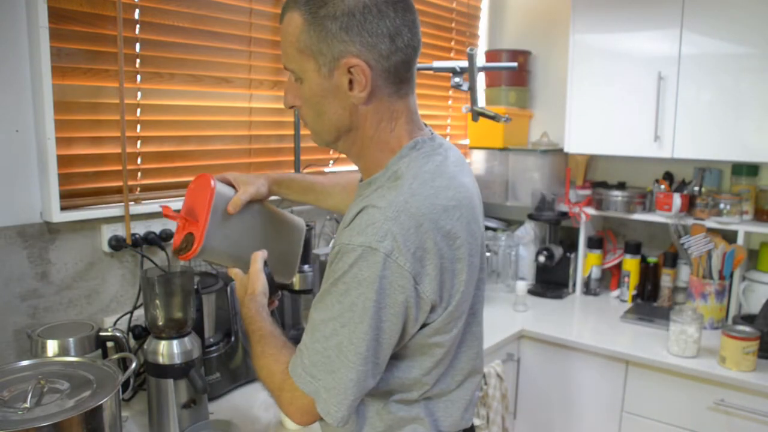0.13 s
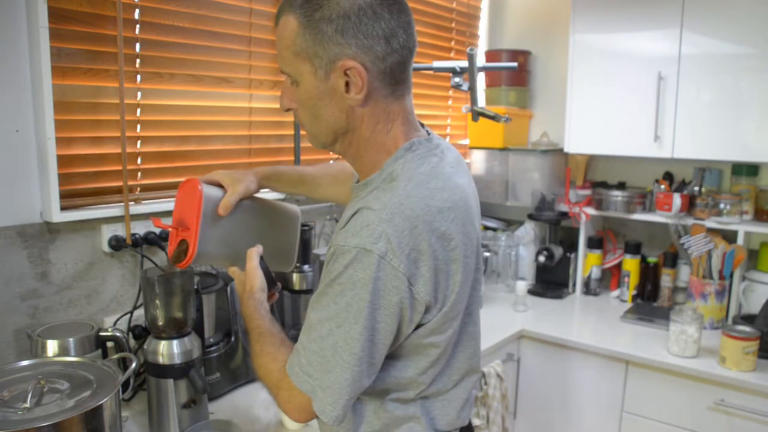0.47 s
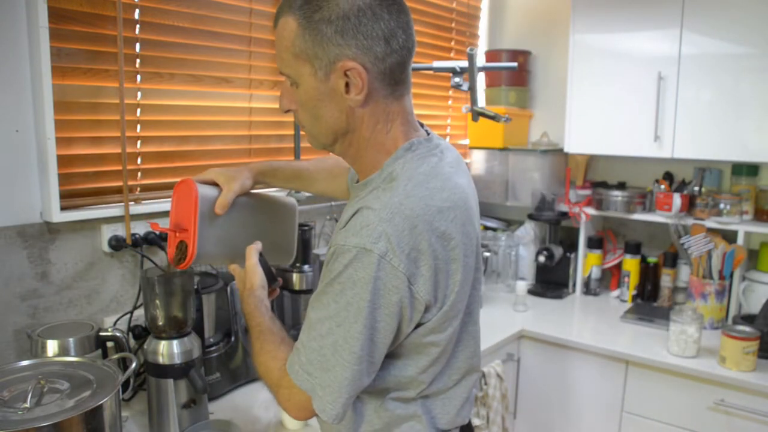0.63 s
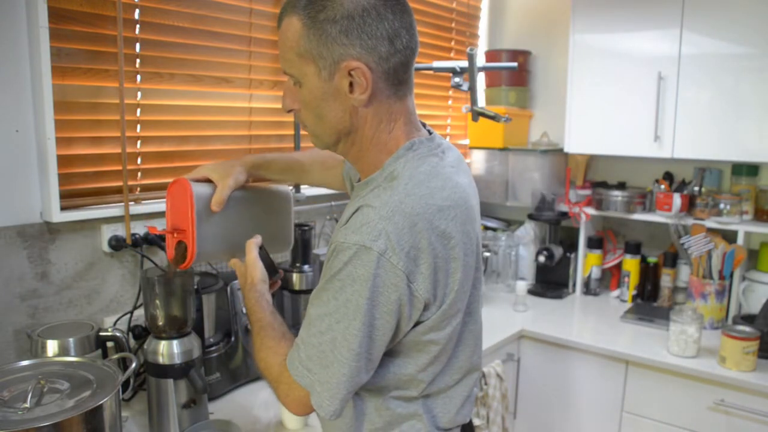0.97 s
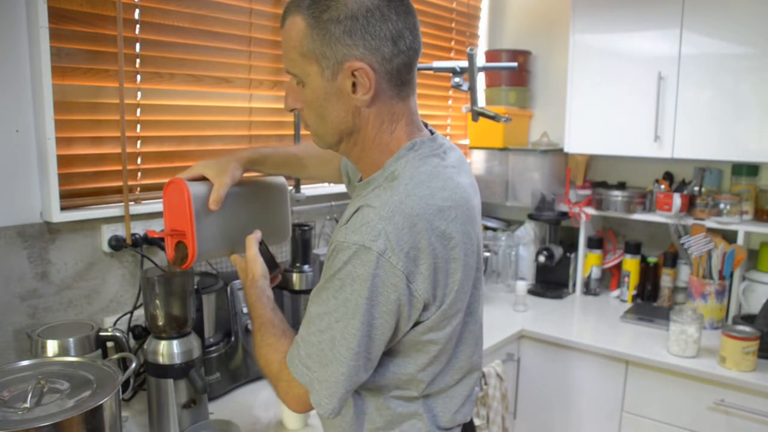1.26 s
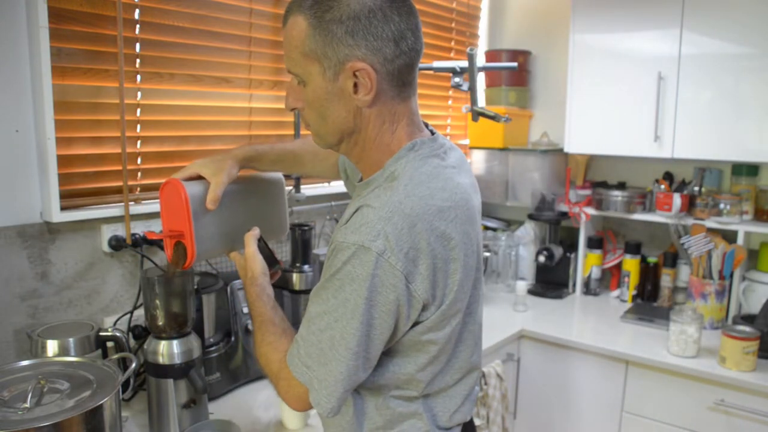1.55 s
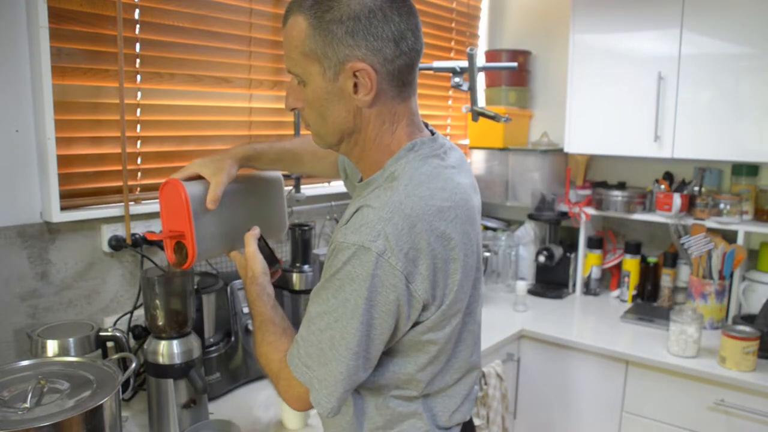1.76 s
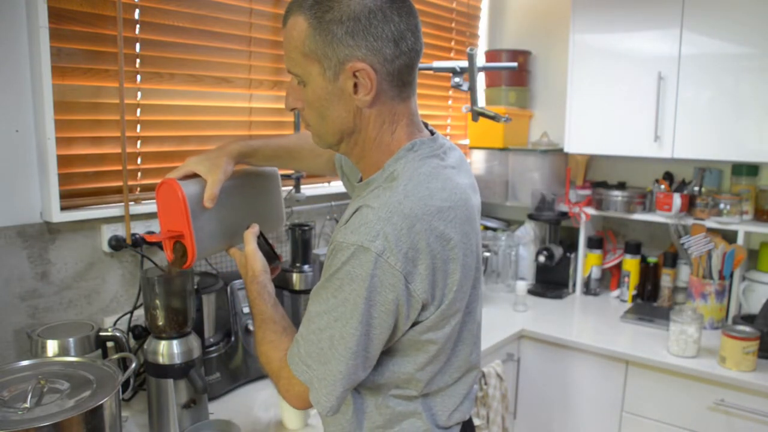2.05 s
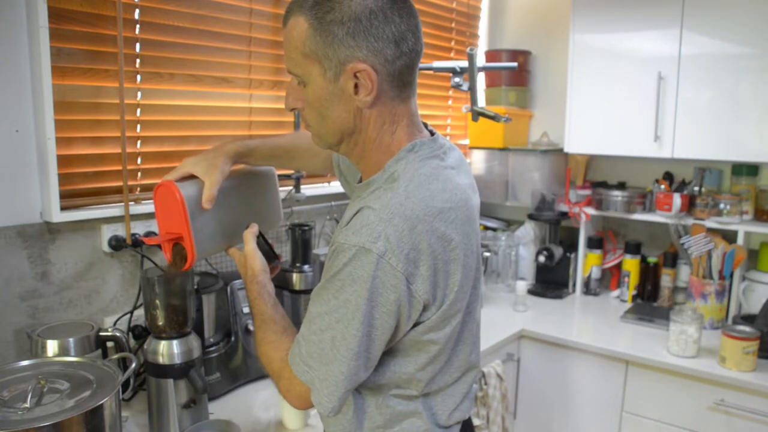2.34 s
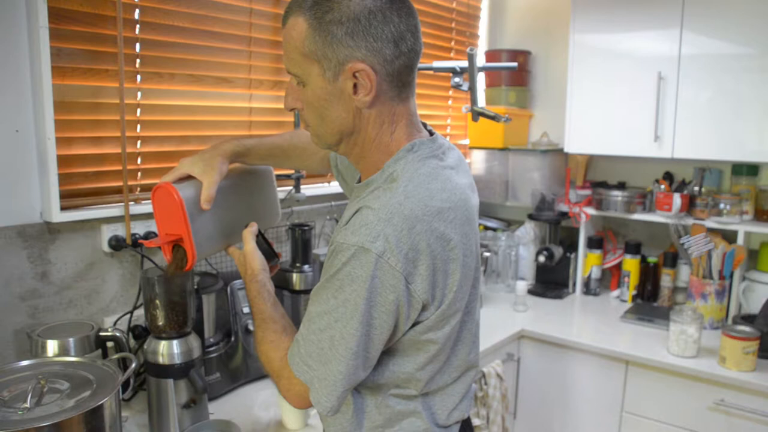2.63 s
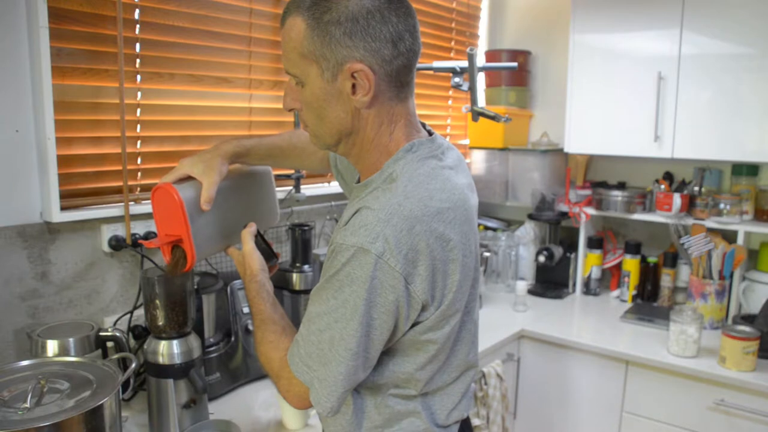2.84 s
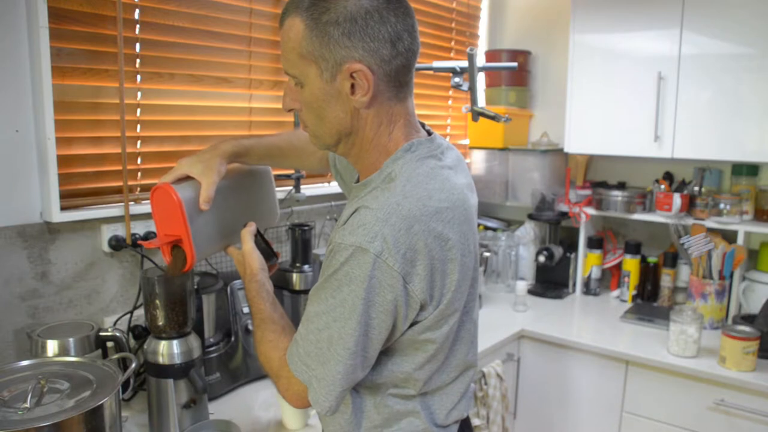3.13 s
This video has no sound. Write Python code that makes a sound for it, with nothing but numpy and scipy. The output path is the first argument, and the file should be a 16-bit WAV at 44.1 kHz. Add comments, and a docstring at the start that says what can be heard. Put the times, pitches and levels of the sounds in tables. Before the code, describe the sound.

Roasted coffee beans pour from a plastic tub into a grinder hopper with a dense rattle

```python
"""Roasted coffee beans slide in a tipped plastic tub over a faint appliance hum in a small kitchen,
then pour into the hopper of a grinder. Random contacts excite short resonances: the first beans ring
on the bare hopper, and as it fills they land on other beans with a drier rattle.
The air in the hopper hums under the steady pour; reflections in the hopper and room spread each click."""
import sys
import numpy as np
from scipy import signal
from scipy.fft import rfft, irfft
from scipy.io import wavfile

SR = 44100
rng = np.random.default_rng(int(sys.argv[2]) if len(sys.argv) > 2 else 0)


def dump(signal):
    """Clip the signal to [-1, 1] and save it as 16-bit WAV at the path in sys.argv[1]."""
    limited = np.clip(np.atleast_2d(signal).T, -1, 1)
    pcm = np.round(limited * 32767).astype(np.int16)
    wavfile.write(sys.argv[1], SR, pcm)


N = 145530

# The steady pour: (time [s], drive of beans on beans [dB], drive of beans on the bare hopper [dB],
# tilt of the bean clicks [dB per octave], low ring of the hopper against its high ring [dB])
POUR_COURSE = [(0.2, -26.5, -29.5, -3.5, 3), (0.25, -32, -35, -7, 2), (0.26, -21, -46, 2.5, 2.5),
               (0.28, -25.5, -42, 0.5, -0.5), (0.39, -26, -26, -1, -0.5), (0.44, -24.5, -24, 0.5, 1),
               (0.6, -34.5, -26.5, -1.5, 0), (0.8, -29.5, -27.5, 0.5, -1.5), (0.93, -33.5, -29, 0.5, -0.5),
               (1.22, -28, -39, 1.5, -2), (1.26, -33, -34.5, 0.5, -1), (1.67, -27.5, -37, -0.5, -7),
               (1.86, -32.5, -43, 1, 0.5), (1.87, -29, -47, -1.5, -8), (2.09, -39.5, -44.5, 5, -1),
               (2.13, -34.5, -50, 4.5, 1.5), (2.71, -32, -42, 2, -3), (3.3, -39.5, -51, 4, -10)]
# The loudest landings: (time [s], relative drive of bean on bean [dB],
# relative drive of the bare hopper [dB])
LOUD_LANDINGS = [(0.1996, 1, -26.5), (0.2268, -3, -32), (0.2606, 0, -11.5), (0.2993, 4.5, -12.5),
                 (0.333, -4, -16), (0.38, -15, -15.5), (0.3987, -9, -10.5), (0.4118, -17, -8.5),
                 (0.448, -17, -14.5), (0.4603, 4, -9.5), (0.516, -22, -38), (0.539, 2, -11.5),
                 (0.5705, -9, -9), (0.6246, -22, -21), (0.648, 2, -15.5), (0.7037, -17, -35),
                 (0.7141, -6, -20), (0.7308, -4, -12), (0.772, -4, -16), (0.793, -3, -14.5),
                 (0.8169, -15, -15), (0.8416, -22, -16), (0.891, -8, -29), (0.9113, -15, -15.5),
                 (0.9442, -19, -18.5), (0.9765, 1, -19), (1.015, -22, -30), (1.0351, -13, -16),
                 (1.0527, 0, -17), (1.0933, -25, -18), (1.1277, -5, -17.5), (1.151, -2, -12),
                 (1.1821, -5, -16), (1.3026, -20, -41), (1.3231, -10, -17), (1.3901, -25, -29),
                 (1.396, -24, -37.5), (1.437, -2, -18), (1.4615, -10, -25), (1.5216, -21, -37),
                 (1.5406, 0, -25.5), (1.5684, 1, -45), (1.6045, -17, -27), (1.6226, 0.5, -21),
                 (1.642, -9, -29), (1.662, -11, -28), (1.689, -10, -46), (1.7623, -18, -47),
                 (1.7707, -1, -24.5), (1.829, -22, -31), (1.8655, -30, -22), (1.8883, -4, -51),
                 (1.9159, -22, -38), (1.936, -2, -26), (2.0606, -33, -45), (2.1274, -22, -31),
                 (2.1394, -9, -34), (2.2115, -2.5, -31), (2.4292, -10, -27.5), (2.4694, -21, -39),
                 (2.4866, -0.5, -50), (2.5225, -35, -48), (2.537, -34.5, -53), (2.564, -23, -45),
                 (2.6438, -24, -51), (2.6587, -28, -35), (2.7156, -6, -30), (2.766, -5, -37),
                 (2.8453, -2, -36), (2.8997, -19, -28.5), (3.0152, -7, -43), (3.0882, -14, -37)]
POUR_START_S = 0.199


def amp(db):
    """Level law: 20 dB are a factor of ten in amplitude."""
    return 10 ** (np.asarray(db) / 20)


def rms_one(x):
    """Normalization to unit mean power."""
    return x / np.sqrt(np.mean(x ** 2) + 1e-20)


def in_time(rows):
    """Linear interpolation of each column over the duration of the scene."""
    seconds, *columns = np.transpose(rows)
    t = np.arange(N) / SR
    return [np.interp(t, seconds, column) for column in columns]


def at_hz(points, hz):
    """Interpolation of a spectrum along logarithmic frequency."""
    point_hz, point_db = np.array(points).T
    return np.interp(np.log(hz), np.log(point_hz), point_db)


def drift(rate_hz):
    """Low-pass filtered noise: two equal real poles leave a slow random course of unit rms."""
    step = 40   # samples between computed values
    pole = np.exp(-2 * np.pi * rate_hz * step / SR)
    noise = rng.standard_normal(N // step + 2002)
    slow = signal.lfilter([1], [1, -2 * pole, pole ** 2], noise)[2000:]   # past the onset
    return np.interp(np.arange(N) / step, np.arange(len(slow)), rms_one(slow))


def ring(clicks, hz, t60_s):
    """Damped resonator: a unit click starts a decaying sine of about unit height."""
    pole = amp(-60 / (t60_s * SR))
    angle = 2 * np.pi * hz / SR
    feedback = [1, -2 * pole * np.cos(angle), pole ** 2]
    return signal.lfilter([0, np.sin(angle)], feedback, clicks + 1e-18)   # offset avoids denormals


def touches(per_s, uneven_db, clump_db):
    """Random point process: contacts of uneven size and sign, stronger in clumps; unit rms."""
    uneven = uneven_db * np.minimum(rng.exponential(1, N), 5)
    sizes = amp(uneven + clump_db * drift(31)) * rng.choice([-1, 1], N)
    return rms_one(sizes * (rng.random(N) < per_s / SR))


def falling_touches(per_s, uneven_db, clump_db):
    """Gated point process: contacts of the pour begin when the first beans fall."""
    falling = np.arange(N) >= POUR_START_S * SR
    return touches(per_s, uneven_db, clump_db) * falling


def landings(db):
    """Impulse bunching: a landing is ten touches of alternating sign with exponential delays."""
    spread_s, count = 0.002, 10
    out = np.zeros(N + SR)
    start_s = np.array(LOUD_LANDINGS)[:, :1]
    chance = rng.random((len(LOUD_LANDINGS), count))
    late_s = -np.log(1 - chance) * spread_s * (np.arange(count) > 0)   # the first touch is on time
    samples = ((start_s + late_s) * SR).astype(int)
    np.add.at(out, samples, amp(db)[:, None] * (-1.) ** np.arange(count))
    return out[:N]


def clatter(clicks, spectrum, cycles, tilt_db=0):
    """Modal excitation: each touch sounds a random quarter of 36 short resonances spread in pitch."""
    share = .25
    pitches = np.geomspace(spectrum[0][0], 15600, 36)
    gains = amp(at_hz(spectrum, pitches)) * pitches
    out = 0
    for hz, gain in zip(pitches, gains):
        tilt = amp(tilt_db * np.log2(max(hz, 2000) / 4000))   # even below 2 kHz
        struck = clicks * (rng.random(N) < share) * tilt
        ringing = ring(struck, hz, cycles / hz)
        out = out + gain * signal.lfilter(*signal.iirpeak(hz, cycles / 4, SR), ringing)
    # a ring of unit height carries the energy t60 * SR / 27.6
    power = np.sum(gains ** 2 / pitches) * share * cycles * SR / 27.6
    return out / np.sqrt(power)


def body(clicks, modes, low_db=0):
    """Modal superposition: each touch drives every mode by a random strength; about unit power."""
    out, power = 0, 0
    for hz, db, t60_s in modes:
        low_gain = amp(low_db * (hz < 2500))   # only modes below 2500 Hz
        struck = clicks * rng.standard_normal(N) * low_gain
        out = out + amp(db) * ring(struck, hz, t60_s)
        power += amp(db) ** 2 * t60_s * SR / 27.6
    return out / np.sqrt(power)


def beans_in_tub():
    """Impact excitation of a plastic shell: shifting beans strike its short resonances."""
    # Beans shifting in the tub: (time [s], drive [dB])
    slide_course = [(0, -34.5), (.1, -40), (.16, -43.5), (.2, -43.5), (.3, -52)]
    # Clatter of the tub: (frequency [Hz], relative density [dB per Hz])
    tub_spectrum = [(240, -50), (400, 8), (739, -30), (960, 9), (2990, 8.5), (3710, 16.5), (5880, 6),
                    (11200, 6), (15700, -85)]
    contacts = amp(in_time(slide_course)[0]) * touches(5300, 3.1, 1.4)
    return clatter(contacts, tub_spectrum, 4.3)


def room_tone():
    """Noise and tone superposition: shaped air noise under hum partials whose levels waver."""
    # Air noise before a further fall of 1 dB per 300 Hz: (frequency [Hz], relative level [dB])
    floor_spectrum = [(25, -24), (60, 1), (110, 9), (250, 13.5), (450, 17.5), (800, -9), (1300, -27),
                      (2500, -16), (6000, -20)]
    # Appliance hum: (frequency [Hz], middle rms level [dB])
    hum_partials = [(161.5, -75.5), (199.2, -78), (323, -72)]
    hz = np.fft.rfftfreq(N, 1 / SR) + 1
    shape = amp(at_hz(floor_spectrum, hz) - hz / 300)
    air = rms_one(irfft(rfft(rng.standard_normal(N)) * shape, N))
    out = amp(-63) * air
    t = np.arange(N) / SR
    for partial_hz, db in hum_partials:
        level = amp(db + 2.0 * drift(1.7))
        out = out + level * np.sqrt(2) * np.sin(2 * np.pi * partial_hz * t)
    return out


def radiated(walls):
    """Radiation efficiency: the small walls radiate little below 1600 Hz."""
    return signal.sosfilt(signal.butter(4, 1600, "high", fs=SR, output="sos"), walls)


def beans_on_bare_hopper():
    """Impact excitation of the bare wall: a broad clack with ringing wall modes."""
    # Modes of the bare hopper: (frequency [Hz], relative level [dB], t60 [s])
    bare_modes = [(1843, -1, 0.033), (1924, 4, 0.032), (2003.4, 4.5, 0.041), (2185, 0, 0.022),
                  (2820, 3.5, 0.011), (4260, -1, 0.015), (6480, 8, 0.0075), (7540, 3.5, 0.046),
                  (7600, -15, 0.01), (7940, -25.5, 0.0067), (7910, -20, 0.09), (8025, -5, 0.06),
                  (10160, -7, 0.025), (10150, 11, 0.0083)]
    # Clack of bean on wall: (frequency [Hz], relative density [dB per Hz])
    clack_spectrum = [(710, -46), (1200, -24), (1550, -62), (1970, -31), (2260, -24), (4360, -3),
                      (5710, -6), (7640, 4.5), (10700, -3.5), (15700, -67)]
    _, bare_db, _, low_db = in_time(POUR_COURSE)
    landing_db = np.transpose(LOUD_LANDINGS)[2] + 8.5
    contacts = amp(bare_db) * falling_touches(1500, 3.36, 1.6) + landings(landing_db)
    clack = amp(-0.5) * clatter(contacts, clack_spectrum, 32.6)
    return clack + radiated(body(contacts, bare_modes, low_db))


def beans_on_beans(steady):
    """Impact excitation of a pile: dry clicks of bean on bean also drive the filled hopper."""
    # Click of bean on bean: (frequency [Hz], relative density [dB per Hz])
    click_spectrum = [(800, -25), (1200, -37), (1600, -24), (2200, -10.5), (2900, -3.5), (3840, 0.5),
                      (4870, 2.5), (5900, -12.5), (9300, -1.5), (11800, -9), (15700, -67)]
    # Modes of the filled hopper: (frequency [Hz], relative level [dB], t60 [s])
    filled_modes = [(4450, -7, .015), (4850, 0, .03), (5000, -6, .02)]
    pile_db, _, tilt_db, _ = in_time(POUR_COURSE)
    landing_db = np.transpose(LOUD_LANDINGS)[1] - 11.5
    contacts = amp(pile_db) * steady + landings(landing_db)
    rattle = clatter(contacts, click_spectrum, 7.94, tilt_db)
    return rattle + radiated(amp(-7.5) * body(contacts, filled_modes))


def hopper_air(steady):
    """Cavity resonance: the steady touches of the pour set the enclosed air humming."""
    # Hum of the hopper air: (time [s], drive [dB])
    air_course = [(.2, -52.5), (.6, -52), (1.2, -52.5), (1.6, -50.5), (2.2, -52.5), (2.8, -51.5),
                  (3.1, -54), (3.3, -54.5)]
    # Modes of the hopper air: (frequency [Hz], relative level [dB], t60 [s])
    air_modes = [(590, -11, .07), (682, 0, .11), (706, -1, .1), (785, -10, .07), (975, -10, .07),
                 (1150, -10, .02)]
    hum = body(amp(in_time(air_course)[0]) * steady, air_modes)
    return signal.sosfilt(signal.butter(2, [500, 1300], "band", fs=SR, output="sos"), hum)


def scatter(x):
    """All-pass dispersion: short loops smear each click without colouring it; their lag is taken out."""
    # Reflections inside the hopper: delay [ms]
    near_delays = [.17, .3, .55]
    for ms in near_delays:
        a = np.zeros(int(ms * SR / 1000) + 1)
        a[0], a[-1] = 1, -.5   # feedback gain 0.5
        x = signal.lfilter(a[::-1], a, np.append(x, 0 * a))[len(a):]
    return x


def echoes(x):
    """Diffuse reverberation: convolution with dulled, exponentially decaying noise of unit energy."""
    t60_s, gap_s, wall_cut_hz = .38, .004, 6800
    t = np.arange(int(.6 * SR)) / SR
    tail = rng.standard_normal(len(t)) * amp(-60 * t / t60_s) * (t > gap_s)
    tail = signal.lfilter(*signal.butter(1, wall_cut_hz, fs=SR), tail)
    return signal.fftconvolve(x, tail / np.sqrt(np.sum(tail ** 2)))[:N]


def scene():
    """Linear superposition: bean sounds, their room echoes and the room tone, alike in both channels."""
    steady = falling_touches(3000, 2.26, 1.53)   # these touches drive both the pile and the air
    beans = beans_in_tub() + beans_on_bare_hopper() + beans_on_beans(steady) + hopper_air(steady)
    near = scatter(beans)
    in_room = near + amp(-5.5) * echoes(near)
    return np.tile(amp(-1.0) * in_room + room_tone(), (2, 1))


def record(dry):
    """Band limitation: a microphone housing cuts three dips, and a steep low-pass removes the top."""
    # Dips of the microphone housing: centre [Hz]
    dip_centres = [5700, 6900, 15020]
    # The same dips: (width [Hz], gain at the centre [dB])
    dip_shapes = [(480, -6.5), (304, -4), (540, -27)]
    for hz, (width_hz, db) in zip(dip_centres, dip_shapes):
        b, a = signal.iirpeak(hz, hz / width_hz, SR)
        dry = dry - (1 - amp(db)) * signal.lfilter(b, a, dry)
    return signal.sosfilt(signal.ellip(12, .5, 60, 15750, fs=SR, output="sos"), dry)


dry = scene()
out = record(dry)
dump(out)
```